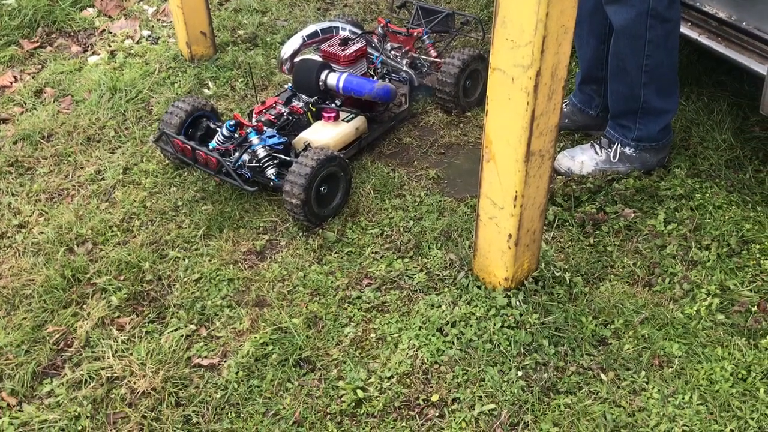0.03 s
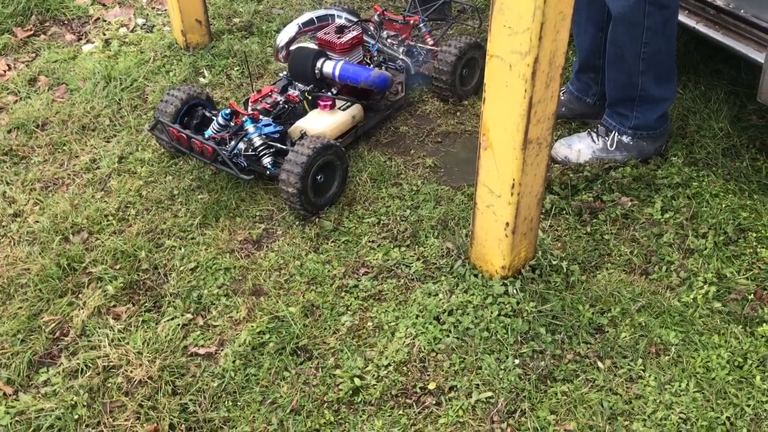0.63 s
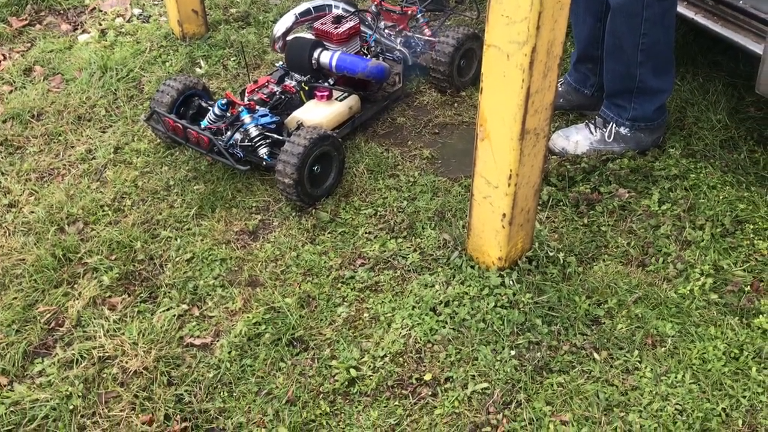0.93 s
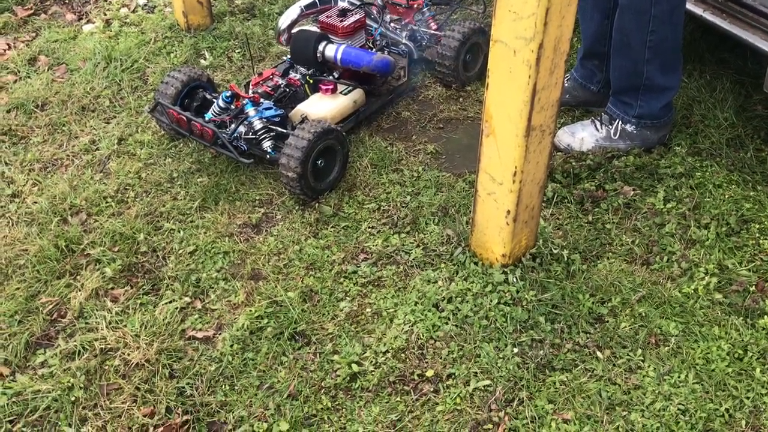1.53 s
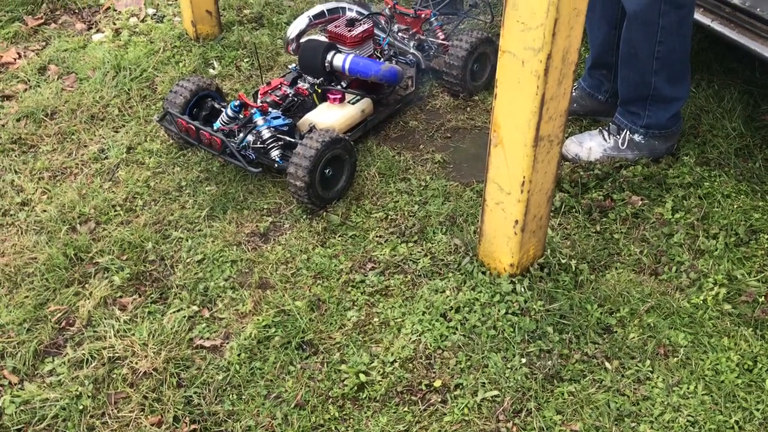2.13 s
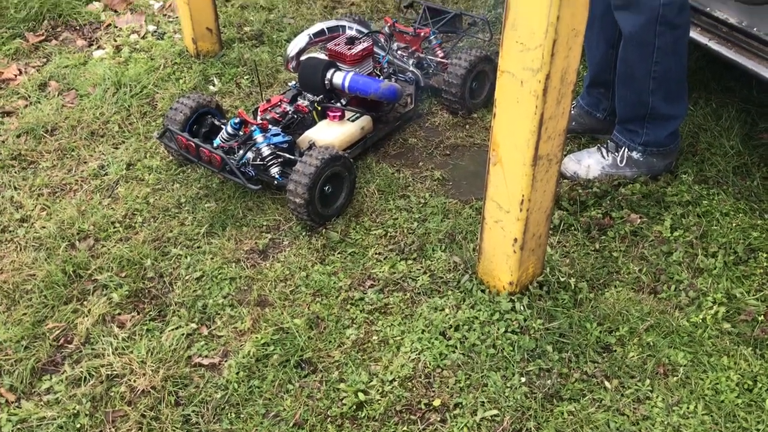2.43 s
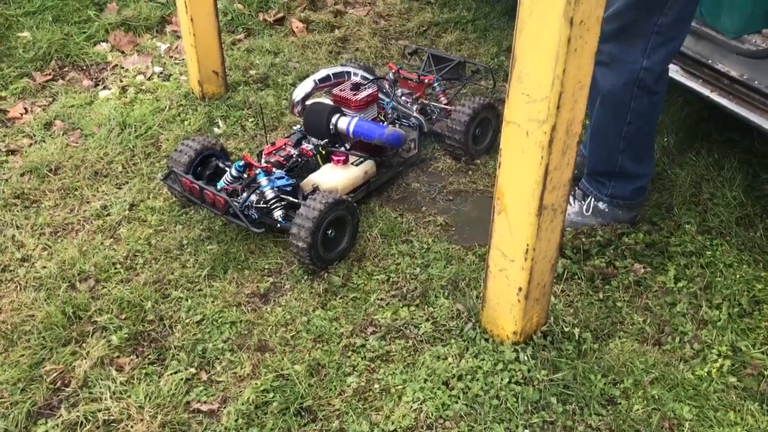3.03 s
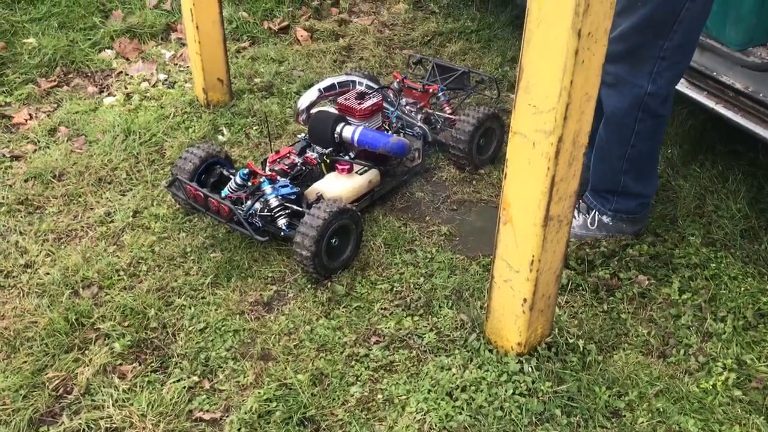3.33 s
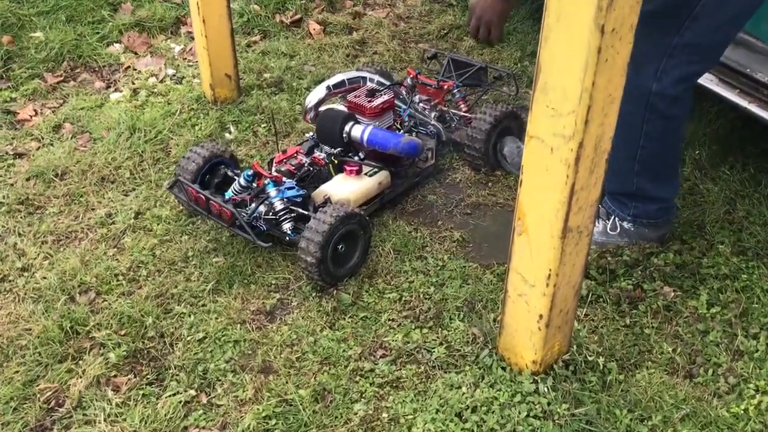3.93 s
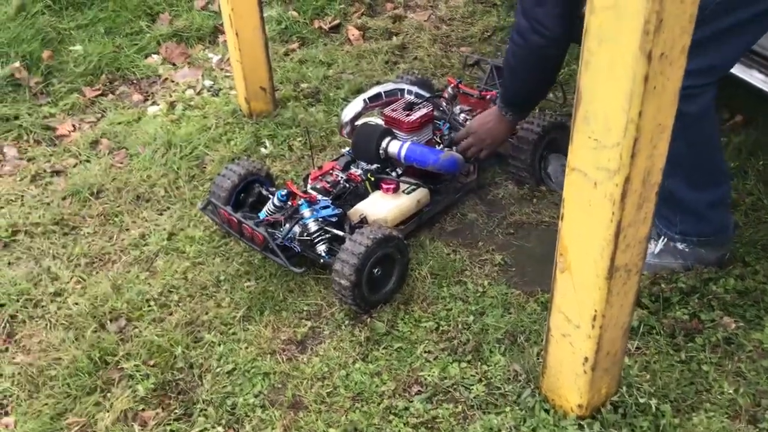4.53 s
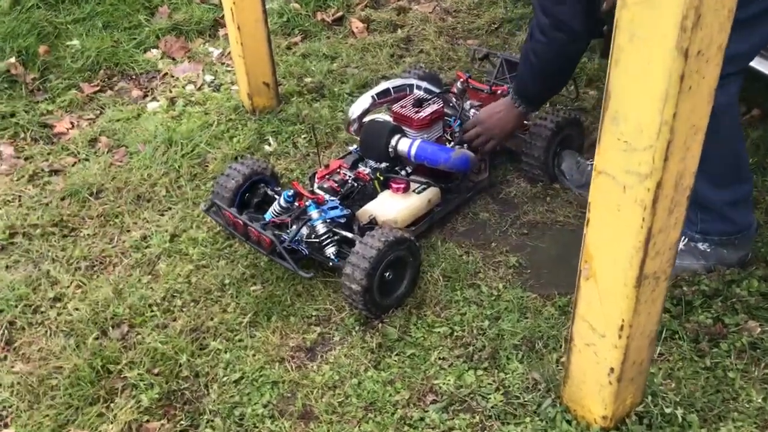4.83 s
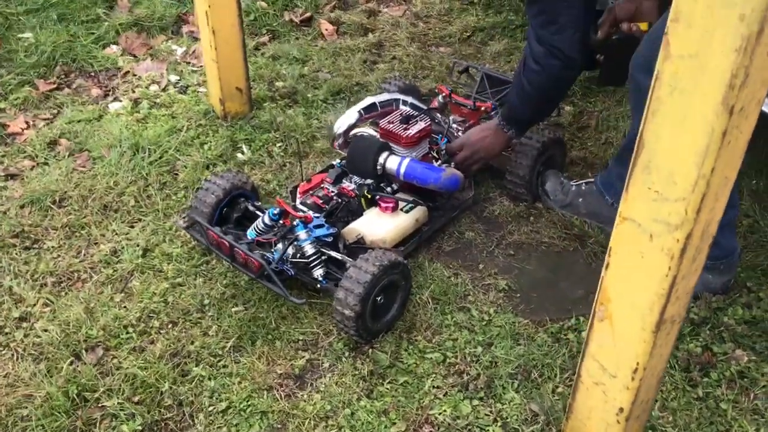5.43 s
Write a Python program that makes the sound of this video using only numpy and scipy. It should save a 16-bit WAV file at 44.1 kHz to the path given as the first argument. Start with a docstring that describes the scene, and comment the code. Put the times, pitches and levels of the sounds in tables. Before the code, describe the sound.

Close by on a lawn, a model car's two-stroke engine catches in short, harsh bursts with sharp bangs, coasting between them while its gears whirr. It then drops in pitch and stalls with dull knocks, soft puffs and tiny metal pings. Afterwards it is quiet outdoors: distant traffic hums, small birds chirp faintly, and clothes swish softly with a few dry ticks.

```python
"""On a lawn, a model car's two-stroke engine runs badly: it catches in short banging bursts and
coasts between them. Exhaust pulses puff, bark and rasp through a ringing pipe while the gears whirr.
It runs down with slack knocks, rocks against its compression and stops with small metal pings.
Far traffic and small birds remain, and clothes swish as someone bends over the car."""
import sys
import numpy as np
from scipy import signal
from scipy.fft import rfft, irfft, next_fast_len
from scipy.io import wavfile
from scipy.ndimage import uniform_filter1d

SR = 44100
rng = np.random.default_rng(int(sys.argv[2]) if len(sys.argv) > 2 else 0)


def write(x):
    x = np.atleast_2d(x).T
    wavfile.write(sys.argv[1], SR, np.round(np.clip(x, -1, 1) * 32767).astype(np.int16))


N = 246078
TIME = np.arange(N) / SR
FFT_SIZE = next_fast_len(N + SR // 4, real=True) * 2
FREQ = np.maximum(np.arange(FFT_SIZE // 2 + 1) * SR / FFT_SIZE, 1)

# revs of the crank: (start [s], end [s], top speed [turns/s], drag afterwards [turns/s per s])
REVS = [(0.079, 0.166, 137.5, 140), (0.283, 0.304, 128.5, 114), (0.467, 0.521, 117, 125),
        (0.569, 0.647, 137.5, 190), (.77, .81, 125.5, 136), (1.017, 1.051, 97.5, 85),
        (1.175, 1.25, 134.5, 250)]
# how much charge the engine draws: (time [s], throttle [0-1])
THROTTLE = [(0, .3), (.19, .8), (.26, .2), (.45, .15), (.71, .8), (.79, .2), (.91, .03), (.98, 0.12),
            (1.045, 0.79), (1.12, 0.4), (1.205, .98), (1.73, 0.94)]
# stretches of clean firing on every turn: (start [s], end [s])
CLEAN_FIRING = [(.11, 0.26), (.625, .725), (1.2, 1.308)]
# exhaust mix: (throttle shut [dB], full-throttle boost [dB], firing boost [dB], cut at standstill [dB])
PUFF_MIX = (-51.5, 22, 2, -4)
BARK_MIX = (-33.5, 8.5, 3.5, 14.5)
RASP_MIX = (-40.5, 8, 13.5, 31.5)
# ring of the pipe and chassis, and of the drive casing: (pitch [Hz], width [Hz], gain [dB])
PIPE_MODES = [(657, 57, -1), (908, 50, -13), (1140, 430, 3.5), (1440, 57, 3.5), (1630, 88.7, -1),
              (1840, 100, 5), (2442, 71, 6), (2650, 43, 5), (2925, 64, 9), (3045, 60, -5.5), (3308, 80, 7),
              (3917, 52, 0), (4170, 140, -2.5), (4500, 56, 4.5), (5570, 110, 6), (6020, 110, 3.5),
              (6550, 120, 3), (8430, 620, -3.5), (12100, 500, 0)]
CASING_MODES = [(2970, 67, -3), (3350, 200, 0.5), (4450, 360, -3), (5570, 170, -2), (6450, 300, -4.5),
                (8300, 440, -4)]
# tone colour of each layer: (frequency [Hz], relative level [dB])
PUFF_EQ = [(30, -24.5), (70, -3.5), (115, 3), (230, 6), (340, 3), (480, -5.5), (800, -37), (2000, -71.5)]
BARK_EQ = [(200, -42), (420, -7), (600, 0), (1000, -3), (1600, 0), (2200, -0.5), (2800, -15), (5000, -26.5),
           (16000, -66.5)]
RASP_EQ = [(700, -31), (2000, -7.5), (3000, -6.5), (5000, 0.5), (6600, 1.5), (7400, -4.5), (10000, -7),
           (13000, -6.5), (16000, -15)]
WHIRR_EQ = [(900, -16), (2000, 5.5), (4500, -1), (6500, -4), (8000, -7.5), (10500, -10), (13000, -8),
            (16000, -15.5)]
HUSH_EQ = [(76, -23.5), (130, -6), (268, -11.5), (378, -15.5), (462, -16.5), (589, -12), (720, -12),
           (954, -9), (1270, -9), (1460, -6), (3200, -20), (4240, -26), (6210, -34), (7600, -40.5),
           (16000, -58.5)]
TYRE_EQ = [(700, -33.5), (1150, -3.5), (1450, -2.5), (1700, 2.5), (2000, -17.5), (3000, -43.5)]
RUMBLE_EQ = [(12, -44), (20, -19), (29, -14), (38, -1), (81, 3), (97, -1.5), (118, -8.5), (171, -13.5),
             (220, -22.5), (290, -43.5), (480, -120)]
BANG_EQ = [(40, -15.5), (150, -0.5), (400, 4), (700, -1.5), (1500, -1.5), (3000, -2.5), (5000, -0.5),
           (6600, 1.5), (7500, -4), (13000, -5), (16000, -13)]
GUST_EQ = [(30, -15), (60, -2.5), (120, -11.5), (190, 1), (350, -3), (600, -18), (2000, -57.5)]
KNOCK_EQ = [(300, -14), (900, 7.5), (1700, -9), (3500, -7), (5000, -20), (8000, -24), (16000, -33)]
CLOTH_EQ = [(1500, 1), (3500, 3), (6000, -0.5), (9000, -1), (12500, 0.5), (16000, 1)]
# fader rides for silencer hum, traffic hush and traffic rumble: (time [s], relative level [dB])
HUM_FADER = [(0, -31), (.35, -43.5), (1.05, -42.5), (1.27, -33.5), (1.42, -47)]
HUSH_FADER = [(2, -46), (2.2, -43.5), (2.7, -44.5), (5.58, -45)]
RUMBLE_FADER = [(1.3, -69), (1.9, -44.5), (2.8, -42), (3.6, -47), (5.58, -43.5)]
# loose metal parts are flicked: (time [s], pitch [Hz], level [dB], time to fall 60 dB [s])
PINGS = [(.0425, 10400, -47, 0.091), (1.757, 6170, -40.5, 0.028), (1.785, 4230, -40.5, 0.047),
         (1.823, 10200, -47, 0.16), (1.825, 4420, -49, 0.083), (1.978, 10700, -45.5, 0.1)]
# the mixture catches, one bang a turn: (start [s], length [s], relative bang [dB], relative thump [dB])
BANG_BURSTS = [(.057, .003, -13, -23.5), (0.0906, .003, -9, -33.5), (.111, .06, -12, -15),
               (0.176, .003, -18, -7), (0.2844, .011, -14, -25.5), (0.47, .003, -13.5, -21),
               (.489, .003, -14.5, -12), (.507, .012, -15, -21), (0.5583, .012, -15, -25.5),
               (0.5925, .055, -12.5, -11.5), (0.7734, .003, -19, -55), (.781, .003, -14.5, -8),
               (0.7865, .003, -13.5, -4), (1.137, .003, -26, -47.5), (1.162, .024, -14.5, -21),
               (1.2024, .043, -13.5, -19.5)]
# hits of the slack drive train, the rocking piston, and clothes and grass: (time [s], relative level [dB])
KNOCKS = [(1.532, -21), (1.633, -20), (1.646, -21.5), (1.682, -19), (1.710, -20.5), (1.731, -29)]
PISTON_ROCKS = [(1.816, -26), (1.877, -26.5), (1.925, -36), (1.957, -31.5)]
DRY_TICKS = [(3.456, -39), (3.9125, -44), (4.3244, -48.5), (4.4383, -53), (4.6773, -38), (5.0719, -46)]
# bird calls: (start [s], length [s], start pitch [Hz], end pitch [Hz], level [dB])
CHIRPS = [(2.66, 0.093, 6500, 6000, -66), (2.84, .09, 4300, 4200, -58), (3.06, 0.096, 4200, 4250, -56.5),
          (4.78, .11, 7650, 7100, -65), (4.932, 0.094, 7400, 7000, -60), (5.033, 0.079, 4200, 4250, -59),
          (5.05, .09, 7380, 7200, -66), (5.164, .08, 7260, 7180, -68.5)]
# movements of the clothes: (peak time [s], swell time [s], level [dB])
SWISHES = [(3.7, 0.066, -50), (4.3, .33, -64.5), (4.605, .018, -60), (4.895, 0.032, -46.5),
           (5.05, 0.12, -66.5), (5.48, 0.046, -61.5)]


def from_db(db):
    """Decibels to gain."""
    return 10 ** (np.asarray(db) / 20)


def unit_rms(x):
    """Scale to rms 1."""
    return x / np.sqrt(np.mean(x ** 2) + 1e-20)


def automation(rows):
    """A (time, value) curve at every sample."""
    return np.interp(TIME, *np.transpose(rows))


def drift(per_s):
    """A wobble that glides between random values of spread 1."""
    knots = rng.standard_normal(4096)
    return np.interp(TIME * per_s, np.arange(len(knots)), knots)


def eq(curve):
    """Causal (minimum-phase) frequency response of an EQ curve."""
    hz, db = np.transpose(curve)
    cepstrum = irfft(np.log(from_db(np.interp(np.log(FREQ), np.log(hz), db))))
    cepstrum[1:FFT_SIZE // 2] *= 2
    cepstrum[FFT_SIZE // 2 + 1:] = 0
    return np.exp(rfft(cepstrum))


def resonances(modes):
    """Response of a ringing body: a direct path plus its modes."""
    return 1 + sum(from_db(db) / (1 + 2j * (FREQ - hz) / width) for hz, width, db in modes)


def through(x, response):
    """Pass a sound through a frequency response."""
    return irfft(rfft(x, FFT_SIZE) * response)[:N]


def noise(curve):
    """Coloured noise, rms 1."""
    return unit_rms(through(rng.standard_normal(N), eq(curve)))


def levelled(x, window_s=0.07):
    """Even out the slow level and keep the pulses."""
    half = int(window_s * SR / 2)
    power = np.abs(uniform_filter1d(uniform_filter1d(x ** 2, 2 * half), half))
    return x / np.sqrt(power + 1e-5 * power.max())


def noise_tails(pulses, rough, decay_s):
    """Give each pulse a dying tail of noise; rough is its size beside the pulse."""
    pole = np.exp(-1 / (decay_s * SR))
    power = signal.lfilter([1 - pole], [1, -pole], pulses ** 2 + 1e-18)
    return pulses + rough * np.sqrt(power) * rng.standard_normal(N)


def clicks(rows):
    """One impulse for each (time, level) row."""
    out = np.zeros(N)
    for s, db in rows:
        out[int(s * SR)] += from_db(db)
    return out


def crank_speed(idle_speed=83.3, drag_ease_s=2.05):
    """Turns per second: each rev lifts the speed, then a weakening drag wears it down."""
    speed = np.full(N, idle_speed)
    for start, end, top, drag in REVS:
        rising = np.interp(TIME, [start, end], [speed[int(start * SR)], top])
        lost = drag * drag_ease_s * (1 - np.exp(-np.maximum(TIME - end, 0) / drag_ease_s))
        speed = np.where(TIME < start, speed, rising - lost)
    return np.maximum(speed, 16)


def exhaust_levels(throttle, slack, release_s=.025):
    """Puff, bark and rasp in dB: throttle and firing lift all three; a slow crank favours the puff."""
    lit = sum(np.interp(TIME, [on - release_s, on, off, off + release_s], [0, 1, 1, 0])
              for on, off in CLEAN_FIRING)
    return [shut + opened * throttle + fired * lit - slowed * slack
            for shut, opened, fired, slowed in (PUFF_MIX, BARK_MIX, RASP_MIX)]


def port_pulses(turns, second, uneven_db, second_at=.56, jitter_s=1.5e-5):
    """One pulse as the exhaust port opens and a weaker second just over half a turn later."""
    whole_turns = np.arange(np.ceil(turns[0]), 1)
    out = np.zeros(N)
    for offset, strength in ((0, np.ones(N)), (second_at, second)):
        timing, force = rng.standard_normal((256, 2))[:len(whole_turns)].T
        onsets = np.interp(whole_turns + offset, turns, TIME) + jitter_s * timing
        at = np.clip(onsets * SR, 0, N - 1).astype(int)
        out[at] += strength[at] * from_db(uneven_db * force)
    return out


def exhaust_puff(turns, throttle, slack):
    """Low puffs of gas from the port; the throttle brings up each turn's second pulse."""
    pulses = port_pulses(turns, second=.054 + .45 * throttle, uneven_db=.5, second_at=.54)
    breathy = noise_tails(pulses, rough=.04 + .65 * slack, decay_s=.016)
    return levelled(through(breathy, eq(PUFF_EQ)))


def rattle(per_s, spread_db):
    """Loose parts touch at random moments and with uneven force."""
    touches = rng.random(N) < per_s / SR
    force = from_db(spread_db * np.clip(rng.standard_normal(N), -2, 2))
    return touches * force * rng.choice([-1, 1], N)


def exhaust_bark(turns, slack, pipe):
    """Port pulses ring the pipe in the mids; a slow drive train adds backlash clatter."""
    pulses = port_pulses(turns, second=np.full(N, .55), uneven_db=1.3)
    breathy = noise_tails(pulses, rough=.5 + 1.3 * slack, decay_s=.012)
    clatter = 1.9 * slack * rattle(per_s=190, spread_db=4)
    return levelled(through(breathy + clatter, eq(BARK_EQ) * pipe))


def gear_buzz(turns, slack, teeth=14.5, backlash_rad=7):
    """Each kick of the crank rattles the gear teeth: a buzz that follows speed and frays with slack."""
    out, play = 0, backlash_rad * slack * drift(150)
    for offset, strength in ((0, 1), (.55, .591)):
        since_kick = (turns - offset) % 1
        out = out + strength * np.sin(2 * np.pi * teeth * since_kick + play) * np.exp(-11 * since_kick)
    return levelled(out * (1 + .2 * drift(200)))


def exhaust_rasp(turns, slack, firing, pipe):
    """The bright edge of the exhaust: tight when firing, mostly rushing air on weak strokes."""
    pulses = port_pulses(turns, second=.6 * (1 - slack), uneven_db=1.5)
    breathy = noise_tails(pulses, rough=1.2 - .47 * firing, decay_s=.0045)
    return levelled(through(breathy, eq(RASP_EQ) * pipe)) * (1 - slack) ** 2


def silencer_hum(turns, hum_hz=645, width_hz=45):
    """The strokes keep one narrow resonance of the silencer ringing."""
    pulses = port_pulses(turns, second=np.full(N, .5), uneven_db=-1.5)
    cavity = 1 / (1 + 2j * (FREQ - hum_hz) / width_hz) ** 2
    hum = levelled(through(noise_tails(pulses, rough=.1, decay_s=.008), cavity))
    return from_db(automation(HUM_FADER)) * hum


def running_engine(speed, pipe, last_turn_s=1.767, stall_s=1.73, stall_db_per_s=210):
    """The crank drives puff, bark, gear buzz, rasp and hum, which all die away at the stall."""
    turns = np.cumsum(speed) / SR
    turns -= np.interp(last_turn_s, TIME, turns)   # the count reaches zero on the last turn
    slack = np.clip(1 - speed / 100, 0, 1)   # the drive loosens below 100 turns/s
    throttle = automation(THROTTLE)
    puff_db, bark_db, rasp_db = exhaust_levels(throttle, slack)
    firing = np.minimum(from_db(rasp_db + 25), 1)   # full once the rasp reaches -25 dB
    gear_gain = from_db(2) * (1 - slack) ** 2 * (1 - .5 * firing) * (1 - .3 * throttle)
    lows = from_db(puff_db) * exhaust_puff(turns, throttle, slack)
    bark = exhaust_bark(turns, slack, pipe)
    mids = from_db(bark_db) * levelled(bark + gear_gain * gear_buzz(turns, slack))
    highs = from_db(rasp_db) * exhaust_rasp(turns, slack, firing, pipe)
    fade = from_db(-stall_db_per_s * np.maximum(TIME - stall_s, 0))
    return fade * (lows + mids + highs + silencer_hum(turns))


def drive_whirr(level_db=-34, grit_db=-5, spin_down_s=1.41, fade_db_per_s=51):
    """Gears and clutch spin with a gritty whirr that rings in their casing and fades as they run down."""
    grains = noise_tails(rattle(per_s=260, spread_db=3), rough=3, decay_s=.003)
    grit = from_db(grit_db) * unit_rms(through(grains, eq(WHIRR_EQ)))
    whirr = unit_rms(through(noise(WHIRR_EQ) + grit, resonances(CASING_MODES)))
    return from_db(level_db - fade_db_per_s * np.maximum(TIME - spin_down_s, 0)) * whirr


def far_traffic(tyre_db=-50.5, nearest_s=3.55, pass_s=.83):
    """A bed of smooth hush and uneven rumble; one vehicle's tyres sing louder as it draws near."""
    hush = from_db(automation(HUSH_FADER) - 1.1 + .4 * drift(12)) * noise(HUSH_EQ)
    distance = np.hypot(1, (TIME - nearest_s) / pass_s)
    tyres = from_db(tyre_db + 1.2 * drift(17)) / distance * noise(TYRE_EQ)
    rumble = from_db(automation(RUMBLE_FADER) + .8 * drift(18)) * noise(RUMBLE_EQ)
    return hush + tyres + rumble


def metal_pings(overtone_ratio=1.46, overtone_db=-6):
    """Small steel parts buzz against their seats: a noisy attack, an unsteady tone and one overtone."""
    out, t = np.zeros(N), TIME[:SR // 4]
    for s, hz, db, t60 in PINGS:
        phase = 2 * np.pi * np.cumsum(hz * (1 + .012 * drift(900)[:len(t)])) / SR
        tone = np.sin(phase) + from_db(overtone_db) * np.sin(phase * overtone_ratio)
        contact = np.exp(-t / .0039) * rng.standard_normal(len(t))
        flutter = 1 + .5 * drift(400)[:len(t)]
        out[int(s * SR):][:len(t)] += from_db(db - 60 * t / t60) * (tone * flutter + contact)
    return out


def thump(start_hz, end_hz, glide_s, decay_s):
    """A slug of gas leaves the pipe: a low swing that sinks in pitch."""
    t = TIME[:SR // 5]
    hz = end_hz + (start_hz - end_hz) * np.exp(-t / glide_s)
    return np.sin(2 * np.pi * np.cumsum(hz) / SR) * np.exp(-t / decay_s)


def bangs(speed, pipe, bang_fade_db=.76, thump_fade_db=1.8, weak_turn_db=-9):
    """Unburnt mixture explodes: a crack, a jet of noise, and a thump that is full on every other turn."""
    cracks, slugs = np.zeros((2, N))
    for s, length, bang_db, thump_db in BANG_BURSTS:
        at = int(s * SR)
        for turn, luck in enumerate(rng.standard_normal(16)):
            cracks[at] += from_db(bang_db - bang_fade_db * turn + .8 * luck)
            slugs[at] += from_db(thump_db - thump_fade_db * turn + luck + weak_turn_db * (turn % 2))
            at += int(SR / speed[at])
            if at > (s + length) * SR:
                break
    t = TIME[:SR // 4]
    # snap, body and tail of each jet
    envelope = 2.7 * np.exp(-t / .0005) + .98 * np.exp(-t / .013) + from_db(-5) * np.exp(-t / .018)
    jet_power = np.abs(signal.fftconvolve(cracks ** 2, envelope ** 2)[:N])
    jet = np.sqrt(jet_power) * rng.standard_normal(N)
    colour = eq(BANG_EQ) * pipe
    blast = through(8 * cracks + jet, colour / np.sqrt(np.mean(np.abs(colour) ** 2)))
    gust = through(noise_tails(slugs, rough=1, decay_s=.0052), eq(GUST_EQ))   # each slug breaks up
    swing = thump(start_hz=189, end_hz=54, glide_s=.003, decay_s=.0099)
    thumps = signal.fftconvolve(slugs, swing)[:N]
    return from_db(-3.5) * blast + from_db(30) * gust + from_db(2.5) * thumps


def drive_knocks(pipe):
    """As the engine stalls, the slack drive train sends dull metal knocks through the chassis."""
    hits = noise_tails(clicks(KNOCKS), rough=3.35, decay_s=.0037)
    return from_db(10.5) * through(hits, eq(KNOCK_EQ) * pipe)


def piston_rocking():
    """The stalled piston rocks against its compression and pushes out soft puffs."""
    body = thump(start_hz=184, end_hz=157, glide_s=.004, decay_s=.01)
    weight = thump(start_hz=88, end_hz=64.8, glide_s=.016, decay_s=.043)
    pushes = noise_tails(clicks(PISTON_ROCKS), rough=.9, decay_s=.0081)
    return signal.fftconvolve(pushes, body + .45 * weight)[:N]


def birds():
    """Far birds: high ones whistle thinly, lower ones rasp."""
    out, waver = np.zeros(N), drift(600)
    for s, length, start_hz, end_hz, db in CHIRPS:
        progress = np.clip((TIME - s) / length, 0, 1)
        rasp = .008 if start_hz > 6900 else .04
        hz = (start_hz + (end_hz - start_hz) * progress) * (1 + rasp * waver)
        out += from_db(db) * np.sin(np.pi * progress) * np.sin(2 * np.pi * np.cumsum(hz) / SR)
    return out


def clothes(fall_to_swell=.74, tick_gain_db=3):
    """Fabric slides over fabric in soft swishes, with a few dry ticks of cloth and grass."""
    power = 0
    for s, swell_s, db in SWISHES:
        from_peak = np.maximum(s - TIME, (TIME - s) / fall_to_swell) / swell_s
        power = power + (from_db(db) * np.exp(.5 - np.hypot(.5, from_peak))) ** 2
    swish = np.sqrt(power) * from_db(1.5 * drift(200)) * noise(CLOTH_EQ)
    ticks = through(noise_tails(clicks(DRY_TICKS), rough=1.6, decay_s=.0018), eq(CLOTH_EQ))
    return swish + from_db(tick_gain_db) * ticks


def scene():
    """Mono mix: the car up front, the quiet outdoors behind it."""
    speed, pipe = crank_speed(), resonances(PIPE_MODES)
    car = running_engine(speed, pipe) + bangs(speed, pipe) + drive_whirr()
    car = car + drive_knocks(pipe) + piston_rocking() + metal_pings()
    return (car + far_traffic() + birds() + clothes())[None]


def record(dry, low_cut_hz=32, ceiling=.68, high_cut_hz=15900):
    """Master chain: trim the deepest bass, round off the loudest peaks, cut the very top."""
    sound = signal.sosfilt(signal.butter(2, low_cut_hz, "high", fs=SR, output="sos"), dry)
    sound = ceiling * np.tanh(sound / ceiling)
    return signal.sosfilt(signal.ellip(10, .1, 70, high_cut_hz, fs=SR, output="sos"), sound)


dry = scene()
out = record(dry)
write(out)
```